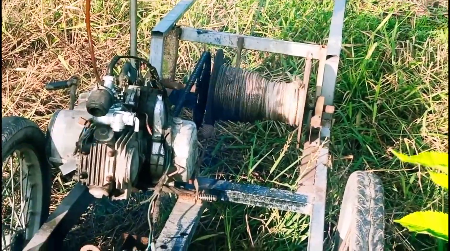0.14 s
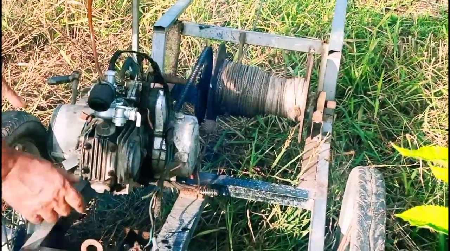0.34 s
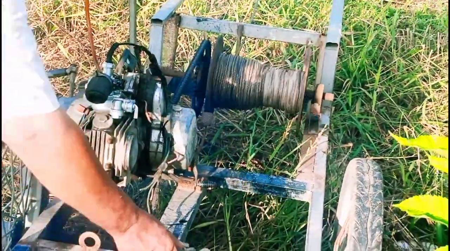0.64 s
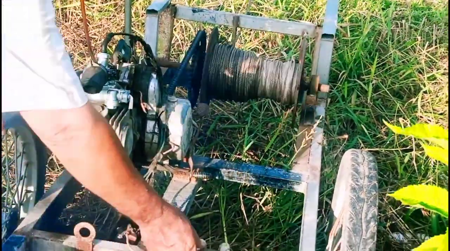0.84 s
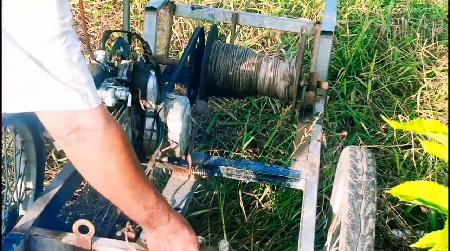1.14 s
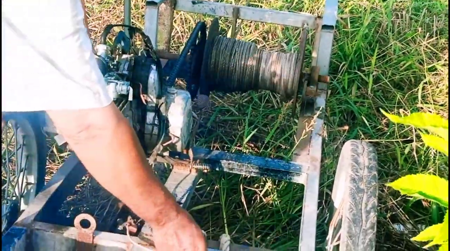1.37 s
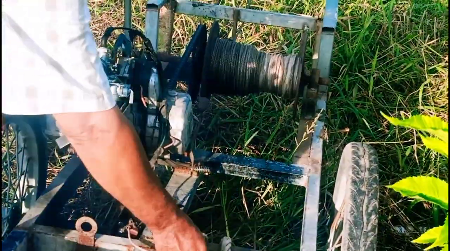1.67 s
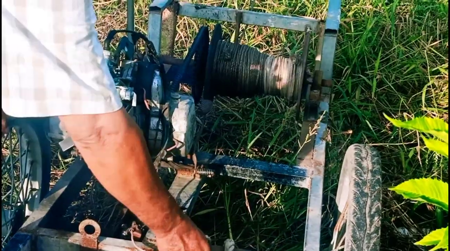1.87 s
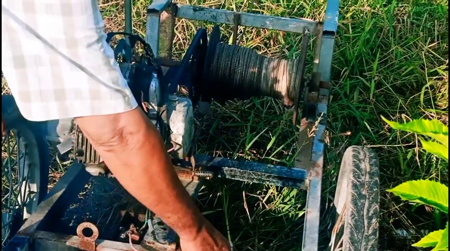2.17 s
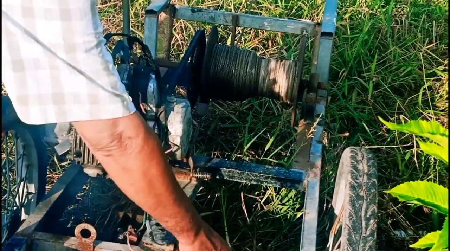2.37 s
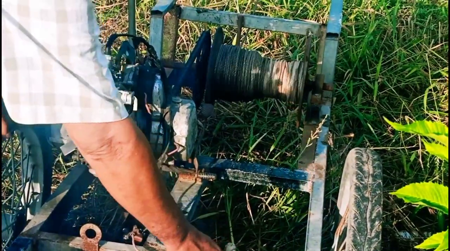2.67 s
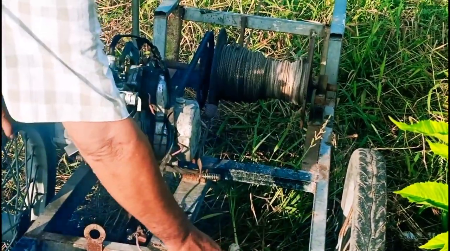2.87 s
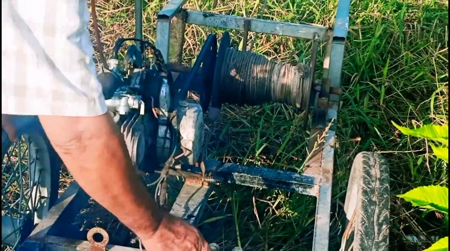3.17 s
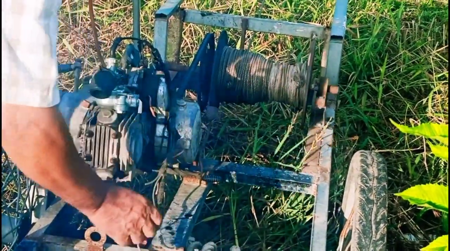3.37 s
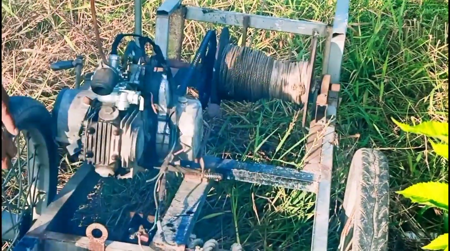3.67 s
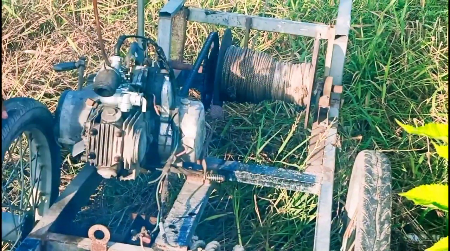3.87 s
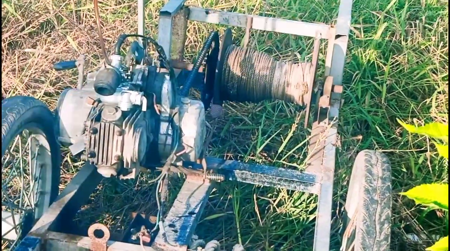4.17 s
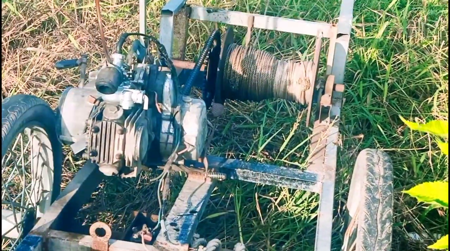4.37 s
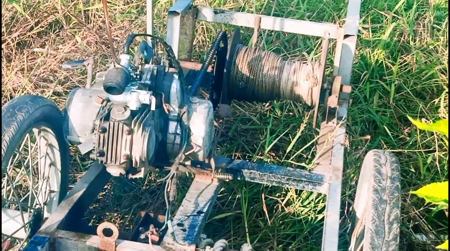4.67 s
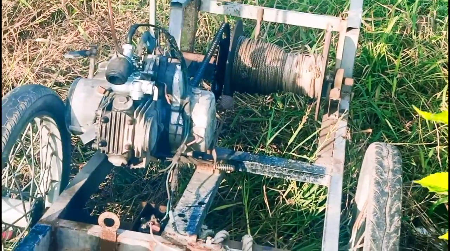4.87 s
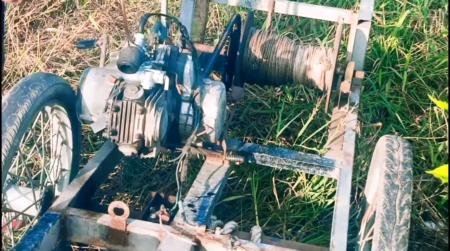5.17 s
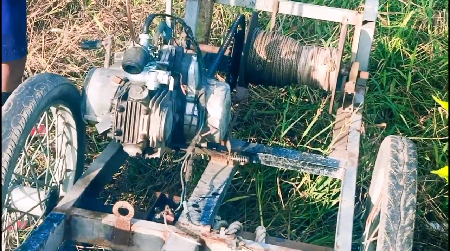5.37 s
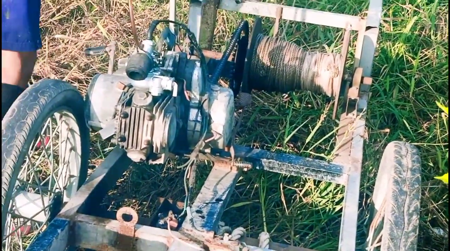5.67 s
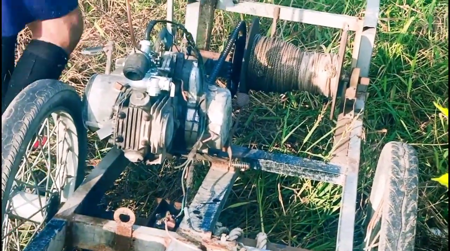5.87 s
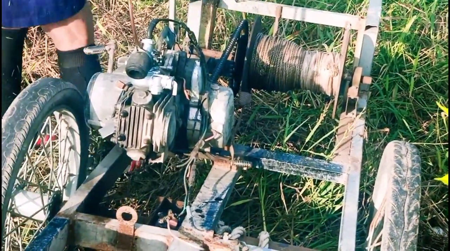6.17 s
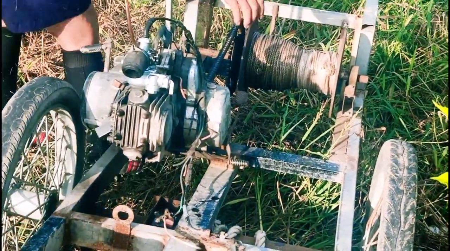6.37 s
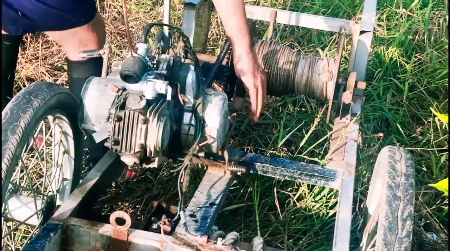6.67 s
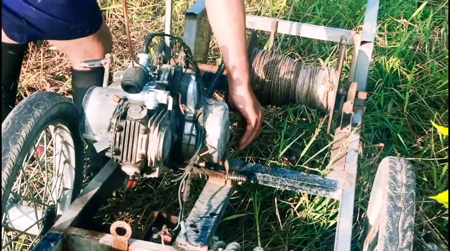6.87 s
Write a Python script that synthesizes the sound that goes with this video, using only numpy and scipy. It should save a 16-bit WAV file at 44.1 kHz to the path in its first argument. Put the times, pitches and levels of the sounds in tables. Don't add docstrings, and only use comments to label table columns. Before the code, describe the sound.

Fast, hard exhaust chatter slows into a steady idle of sharp pops alternating with hollow rising gulps, over faint steel rattling, close outdoors.

```python
import sys
import numpy as np
from scipy import signal
from scipy.fft import rfft, irfft
from scipy.io import wavfile
from scipy.ndimage import uniform_filter1d

SR = 44100
rng = np.random.default_rng(int(sys.argv[2]) if len(sys.argv) > 2 else 0)


def how_loud(loudness_db):
    steps = np.asarray(loudness_db, float) / 20
    return 10 ** steps


def materialize(psi):
    bounded = np.clip(np.atleast_2d(psi).T, -1, 1)
    quanta = np.round(bounded * 32767).astype(np.int16)
    wavfile.write(sys.argv[1], SR, quanta)


N = 310023

# time in seconds, turns per second.
CRANK_SPEED = [(0.0, 28.1492), (0.33, 28.0573), (0.9, 26.5814), (1.43, 26.4948), (1.75, 26.5305),
               (1.95, 26.8856), (2.32, 19.8876), (2.64, 16.296), (3.04, 14.3657), (3.46, 13.0493),
               (3.94, 12.4978), (4.56, 12.3566), (5.48, 12.3971), (6.32, 12.2766), (6.51, 12.3479),
               (7.04, 12.3306)]
# time in seconds, level of the pipe in dB, shaking of the frame in dB.
LEVEL_CURVE = [(0, -9.5, -31), (.3, -9, -31), (.53, -8, -31), (.8, -8.5, -36), (1.05, -8, -36.5),
               (1.38, -6.5, -35.5), (1.66, -8, -38.5), (1.85, -8, -34), (2.09, -7, -40.5),
               (2.51, -8.5, -45), (2.8, -11, -46.5), (3.41, -11.2, -46), (3.78, -10.5, -42.5),
               (4.45, -10.5, -41), (4.95, -6.5, -38.5), (5.4, -4.5, -36), (6.2, -5, -36),
               (7.03, -4.5, -35)]
# frequency in Hz, level in dB, phase in rad, share of clatter heard by both.
PORT_BALANCE = [(60, -.9, -.05, .95), (260, -1, -.06, .96), (600, 0, 0, .95), (760, 2.5, -.1, .92),
                (870, 4.5, -.2, .9), (1080, 3, -1.6, .85), (1380, -1, -1.3, .8), (1810, -2, -1.9, .75),
                (2550, 3, -6, .75), (3050, 0.5, -9, .7), (4200, -4.5, -8.4, .75), (5200, -4, -9.6, .7),
                (6200, -7, -12.3, .7), (8000, 5, -15, .4), (16000, 1.5, -25, .4)]
FAST_MS, IDLE_MS = 40, 81.8


def evened(x):
    return x / np.sqrt(np.mean(x ** 2) + 1e-20)


def read(points, hz, order=1):
    table = np.transpose(points)
    return np.interp(np.log(hz + 1), np.log(table[0] + 1), table[order])


def curve(points, s):
    table = np.transpose(points)
    return [np.interp(s, table[0], column) for column in table[1:]]


def odd(rows, s, usual):
    return next((row[1:] for row in rows if abs(row[0] - s) < .015), usual)


def add(mix, s, shape):
    first = max(round(s * SR) - 800, 0)
    part = mix[..., first:first + 2600]
    part += shape((np.arange(first, first + part.shape[-1]) / SR - s) * 1000)


def bump(ms, rise_ms, fall_ms):
    return np.exp(-.5 * (ms / np.where(ms < 0, rise_ms, fall_ms)) ** 2)


def blow(ms, rise_ms, fall_ms):
    return np.where(ms < 0, bump(ms, rise_ms, rise_ms), np.exp(-np.maximum(ms, 0) / fall_ms))


def chirp(ms, hz, hz_per_ms):
    return np.cos(2 * np.pi * (hz * ms + .5 * hz_per_ms * ms ** 2) / 1000)


def noise(colour, patchy_db):
    frames = N // 64 + 8
    a, b, patches = rng.standard_normal((3, 2, frames, 129)).transpose(0, 1, 3, 2)
    patches = uniform_filter1d(patches[0], size=3, axis=0)
    patches = evened(uniform_filter1d(patches, size=9, axis=1))
    flat = signal.istft((a + 1j * b) * how_loud(patchy_db * patches), nperseg=256, noverlap=192)[1][:, :N]
    return evened(irfft(rfft(flat) * how_loud(colour(np.fft.rfftfreq(N, 1 / SR))), N))


def clatter(shake):
    # frequency in Hz, level in dB.
    rumble_colour = [(30, -32), (60, -22.5), (110, -6), (250, 4.5), (320, -9), (390, -10), (700, 4.5),
                     (950, -2.5), (1100, -65)]
    rattle_colour = [(700, -54), (1000, -6.5), (1600, -6.5), (2100, -5.5), (2600, -7.5), (3400, -9.5),
                     (4500, -52.5)]
    hiss_colour = [(2500, -66.5), (3500, 2), (5200, -3.5), (6200, -4.5), (7200, -13.5), (8400, -23),
                   (9000, -32), (9400, -23.5), (10200, -37), (11200, -31), (12500, -34.5), (14500, -38),
                   (15400, -29), (16200, -61)]
    # frequency in Hz, width in Hz, boost in dB.
    steel_modes = [(1470, 30, 6.5), (1770, 110, 7.5), (2370, 67, 3), (2500, 79, -2)]

    def ringing(hz):
        modes = sum(db / (1 + (2 * (hz - f) / width) ** 2) for f, width, db in steel_modes)
        return read(rattle_colour, hz) + modes

    t = np.arange(N) / SR
    body_db = curve(LEVEL_CURVE, t)[1]
    hiss_db = body_db - 11 + 0.1225 * (1000 / curve(CRANK_SPEED, t)[0] - FAST_MS)
    rumble = how_loud(body_db - 8) * noise(lambda hz: read(rumble_colour, hz), patchy_db=5.0)
    body = how_loud(body_db) * noise(ringing, patchy_db=2.5)
    hiss = how_loud(hiss_db) * noise(lambda hz: read(hiss_colour, hz), patchy_db=4.5)
    return rumble * (1 + 1.26 * shake) + body * (1 + 0.35 * shake) + hiss * (1 + 0.31 * shake)


def crack(jet, db, hz, lead_ms, slow_ms=0):
    # frequency in Hz, level in dB, dB per ms of slower turn.
    port_modes = ((4230, -1.5, .16), (6180, 2.5, -.05))

    def shape(ms):
        hiss = jet[:, rng.integers(0, N - 2600):][:, :len(ms)]
        burst = blow(ms + lead_ms, 0.86, 2.6) + how_loud(-9.0) * blow(ms + lead_ms, 0.59, 16.8)
        whistle = 0
        for f, own_db, per_ms in port_modes:
            mode_db = own_db + per_ms * slow_ms - 3.5 * abs(f - hz) / 1000
            whistle = whistle + how_loud(mode_db) * chirp(ms, f * rng.uniform(.975, 1.025), -10)
        whistle = whistle * how_loud(-3.1 + 0.1256 * slow_ms) * bump(ms + lead_ms - 1.2, 1, 1.9)
        return how_loud(db) * (hiss * burst + whistle)
    return shape


def muffler(ms, fall_ms):
    return chirp(ms, 401, 14.0) * blow(ms, 0.79, fall_ms) + 0.33 * bump(ms + 0.85, 1.9, 2.9)


def gulp(stroke_ms, db, hz, half_ms, squeak_db, wobble):
    def shape(ms):
        swell = chirp(ms, hz * 0.98, 1750 / stroke_ms) * bump(ms, 0.69 * half_ms, 0.86 * half_ms)
        squeak = how_loud(squeak_db) * chirp(ms - 6.8, 1087, 36) * bump(ms - 6.8, 2.14, 2.03)
        early = ms + .12 * stroke_ms + .2 * wobble[0]
        late = ms - .168 * stroke_ms
        knock = .6 * chirp(early, 640, 0) * bump(early + .7, 1.2, .8) + .5 * bump(early + .6, 1, .8)
        knock += -.5 * bump(early - 1.8, .8, 1.1) - .3 * bump(early + 2.9, 1.2, .6)
        closing = 0.4 * bump(late + 2.6, 1.1, 0.37) - bump(late, 0.43, 0.17) + .5 * bump(late - 3.4, 1.4, 2.0)
        knock_db = -14.5 - .2 * (IDLE_MS - stroke_ms) + 1.5 * wobble[1]
        return how_loud(db) * (swell + how_loud(knock_db) * knock + how_loud(-17.0) * closing) + squeak
    return shape


def pop(stroke_ms, dip_db, rebound_db, ring_db, wobble):
    def shape(ms):
        dip = .3 * bump(ms + 1.5, 2.0, .55) - bump(ms, .4, .42)
        rebound = -chirp(ms - 1.45, 570, 0) * bump(ms - 1.45, 1.0, 1.0)
        late = .185 * stroke_ms
        rattle = how_loud(-18.0 + 1.6 * wobble[0]) * chirp(ms - late, 790 * (1 + 0.017 * wobble[1]), 13)
        rattle *= bump(ms - late, 0.093 * stroke_ms, 0.03 * stroke_ms)
        closing = bump(ms - 1.362 * late, 0.37, 0.99) - 0.086 * bump(ms - 1.2 * late - 3.2, 6.9, 1.4)
        closing *= -how_loud(-16.5)
        ring = how_loud(ring_db) * muffler(ms - 3.3, 3.07)
        return how_loud(dip_db) * (dip + rattle + closing) + how_loud(rebound_db) * rebound + ring
    return shape


def bark(ring_db, thump_db, wobble):
    def shape(ms):
        thump = 0.44 * bump(ms + 4.98, 0.5, 0.32) - bump(ms + 3.08, 0.6, 1.0) + .5 * muffler(ms - .2, 1.96)
        thump += 0.58 * bump(ms + 0.41, 2.2, 1.0) - 0.6 * bump(ms - 2.6, 3.2, 1.74)
        thump += 0.23 * bump(ms - 6.3, 3.5, 1.8) - 0.14 * bump(ms - 11, 3.3, 0.69)
        ring = chirp(ms, 655 * (1 + 0.0047 * wobble[0]), 44.4)
        ring *= 0.76 * bump(ms - .4, 1.83, 1.79) + .2 * blow(ms - .4, 1.95, 4.3)
        back = how_loud(-25.5 + 1.8 * wobble[1]) * chirp(ms - 8.2, 640, 4.6) * bump(ms - 8.5, 2.0, 1.6)
        return how_loud(thump_db + 0.44) * thump + how_loud(ring_db) * (ring + back)
    return shape


def strokes():
    # start in seconds, level in dB.
    frame_ticks = [
        (1.953, -22.5),
        (3.1317, -30.5),
        (4.355, -32),
        (5.287, -25.5),
        (5.3227, -26),
        (5.5157, -37),
        (6.4578, -33),
        (6.62, -32),
    ]
    # frequency in Hz, level in dB.
    gas_colour = [(900, -29), (1700, 1.5), (2500, 0.5), (3300, 2), (4300, -1), (5300, 3), (6200, -2),
                  (7500, -12), (10000, -28), (15400, -25.5), (16200, -58)]
    # time in seconds, frequency in Hz, spread in Hz.
    favoured_tone = [(0, 4700, 1100), (1.58, 4700, 1100), (1.64, 6150, 150), (4.0, 6100, 150),
                     (4.06, 4150, 150), (4.95, 4200, 100), (5.02, 6250, 200), (5.62, 6200, 200),
                     (5.68, 4300, 100)]
    # time in seconds, force in dB, crack in dB.
    odd_strokes = [(.15, 1.5, 1), (.186, -1.5, -1), (.221, -2.5, 0.5), (.328, -2.5, -1.5), (.364, -2, -3.5),
                   (.4, -0.5, -6.5), (.436, 0.5, -0.5), (.508, 2, -2.5), (.728, -2.5, 1),
                   (.802, -4.5, -2.5), (.84, -4.5, -4), (.951, -5, 3), (1.14, -1.3, -1.5), (1.178, 0, 4),
                   (1.216, -2, -3), (1.253, -5, 2), (1.291, 0, -2), (1.517, 0.5, 3), (1.555, -1.5, -1.5),
                   (1.593, -1.3, 0.5), (1.668, -11.5, 1.5), (2.006, -1, -2.5), (2.17, -1.5, 1.5),
                   (2.767, 1, -3.5), (3.32, 0, -3.5), (4.423, 1.5, -1), (5.392, 0, 1.5), (5.715, 0, 2.5),
                   (5.878, 0, -0.5), (6.04, -.5, 3.5)]
    # time in seconds, force in dB, length factor, squeak in dB.
    odd_gulps = [(2.364, -6.5, 1.4, 2), (2.585, -1, 1.4, 10), (2.708, -2.5, 1.6, 9), (2.836, 0.5, 1.23, -9),
                 (2.97, 0.5, 1.45, -23), (3.108, -2.5, 1.17, 9.5), (3.87, -2.5, 1.4, -1),
                 (4.029, 0, 1.2, -7.5), (4.189, -1.5, 1.3, 4), (4.512, 0, 1.03, 3), (4.674, 0.8, 1.1, 2.5),
                 (4.836, 0.6, 0.87, 7.5), (4.998, 1, 0.82, 4), (5.159, -.5, 1.06, -1), (5.32, -2, 1.5, 1),
                 (5.481, 0.1, 0.94, 8.5), (5.643, .3, 1.3, 3.5), (5.805, 0, 1.06, -6),
                 (5.967, -2.3, 1.2, -1), (6.129, -0.5, .8, 4), (6.455, 3, 0.76, 5.5),
                 (6.616, 0.5, 0.9, 3.5), (6.779, 1.2, 0.85, -1)]
    throttle_shut_s, alternate_s = 1.99, 2.33
    early_gulps_s = np.array((2.05, 2.22))

    jet = noise(lambda hz: read(gas_colour, hz), patchy_db=3.5)
    (pipe, shake), gas = np.zeros((2, N)), np.zeros((2, N))
    t = np.arange(N) / SR
    turns = -.2083 + np.cumsum(curve(CRANK_SPEED, t)[0]) / SR
    first_pair = np.ceil(np.interp(alternate_s, t, turns))
    for turn, chance in zip(range(int(turns[-1]) + 1), rng.standard_normal((200, 5))):
        s = np.interp(turn, turns, t)
        stroke_ms = 1000 / curve(CRANK_SPEED, s)[0]
        slow_ms = max(stroke_ms - FAST_MS, 0)
        force_db, shake_db = curve(LEVEL_CURVE, s)
        tone_hz, spread_hz = curve(favoured_tone, s)
        odd_db, odd_crack_db = odd(odd_strokes, s, (0, 0))
        crack_db = shake_db + 9.5 + odd_crack_db + 1.75 * chance[2]
        crack_hz = tone_hz + spread_hz * np.clip(chance[3], -1.4, 1.4)
        in_turn = turn >= first_pair and (turn - first_pair) % 2 == 0
        if s < throttle_shut_s:
            s = np.interp(turn + .0183, turns, t)
            thump_db = -1 + 0.53 * shake_db + 0.27 * odd_db + 0.23 * chance[4]
            add(pipe, s, bark(force_db + odd_db, thump_db, chance))
            add(gas, s, crack(jet, crack_db, crack_hz, lead_ms=3.67))
            add(shake, s, lambda ms: 2.97 * blow(ms, 1.4, 5.0))
        elif in_turn or min(abs(s - early_gulps_s)) < .015:
            s = np.interp(turn - .05 + .00189 * stroke_ms, turns, t)
            odd_db, longer, odd_squeak_db = odd(odd_gulps, s, (0, 1, 0))
            db = force_db + odd_db
            hz = 689.5 - 9.5 * s + 4 * chance[3]
            half_ms = longer * (1.75 + 0.029 * slow_ms)
            add(pipe, s, gulp(stroke_ms, db, hz, half_ms, db - 22.5 + odd_squeak_db, chance))
            add(shake, s, lambda ms: 2.44 * blow(ms - 5.0, 8.9, 18))
        else:
            dip_db = force_db + odd_db - 8.5 + 7.5 * (stroke_ms / IDLE_MS) ** 8
            ring_db = dip_db - 3 - 0.5 * max(70 - stroke_ms, 0)
            rebound_db = max(5.5 - 0.4475 * slow_ms, -13 + 6 * chance[4])
            add(pipe, s, pop(stroke_ms, dip_db, dip_db + rebound_db, ring_db, chance))
            add(gas, s, crack(jet, crack_db, crack_hz, lead_ms=1.82, slow_ms=slow_ms))
            add(shake, s, lambda ms: 1.57 * blow(ms, 8.7, 22))
    for s, db in frame_ticks:
        add(gas, s, crack(jet, db - 6.5, 4200, lead_ms=-0.29))
    return pipe, gas, shake


def left_port(x):
    # peak in Hz, its width in Hz, notch in Hz, its width in Hz.
    cavity = (480, 150, 562, 80)
    hz = np.fft.rfftfreq(N, 1 / SR)
    peak, notch = (1 - (hz / f) ** 2 + 1j * hz * width / f ** 2 for f, width in np.reshape(cavity, (2, 2)))
    shading = how_loud(read(PORT_BALANCE, hz)) * np.exp(1j * read(PORT_BALANCE, hz, order=2))
    return irfft(rfft(x) * notch / peak * shading, N)


def ground(x):
    # centre in Hz, notch width in Hz, skirt width in Hz.
    soil_notch = (308, 31.4, 49.5)
    hz, narrow, wide = soil_notch

    def resonator(width):
        radius = np.exp(-np.pi * width / SR)
        return [1, -2 * radius * np.cos(2 * np.pi * hz / SR), radius ** 2]

    return signal.lfilter(resonator(narrow), resonator(wide), x)


def scene():
    pipe, gas, shake = strokes()
    near, other = gas + clatter(shake)
    same = np.clip(read(PORT_BALANCE, np.fft.rfftfreq(N, 1 / SR), order=3), 0, 1)
    mixed = irfft(same * rfft(near) + np.sqrt(1 - same ** 2) * rfft(other), N)
    return ground(np.array([left_port(pipe + mixed), pipe + near]))


def treble_gate(x, from_hz, under_db, waver_db):
    hz, _, z = signal.stft(x, SR, nperseg=1024)
    power = uniform_filter1d(abs(z) ** 2, size=2, axis=2)
    mids = np.median(power[:, (hz > 1000) & (hz < 4000)], 1, keepdims=True)
    bands = np.repeat(rng.standard_normal((z.shape[2], 33)), 16, axis=1).T[:len(hz)]
    limit_db = waver_db * evened(uniform_filter1d(bands, size=4, axis=1)) - under_db
    quiet = (power < mids * how_loud(2 * limit_db)) & (hz > from_hz)[:, None]
    gain = np.where(quiet, how_loud(-40), 1)
    return signal.istft(z * gain, SR, nperseg=1024)[1][:, :N]


def top_cut(x):
    return signal.sosfilt(signal.butter(12, 16450, fs=SR, output="sos"), x)


def record(dry):
    rolled = signal.sosfilt(signal.butter(3, 58, "high", fs=SR, output="sos"), dry)
    gated = treble_gate(rolled, from_hz=4900, under_db=29.0, waver_db=5.0)
    return top_cut(gated)


dry = scene()
out = record(dry)
materialize(out)
```